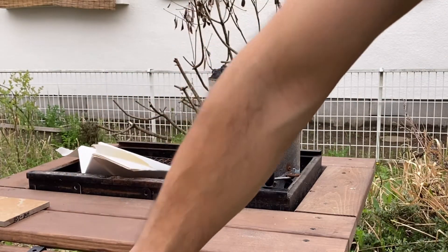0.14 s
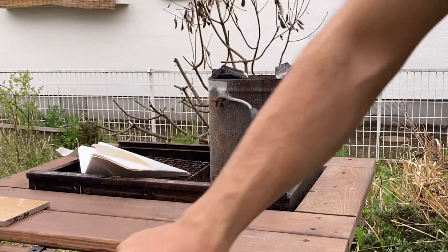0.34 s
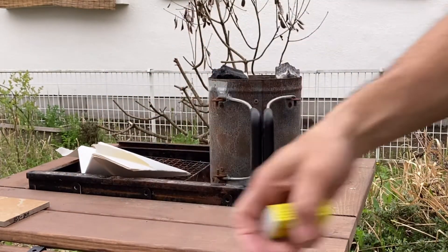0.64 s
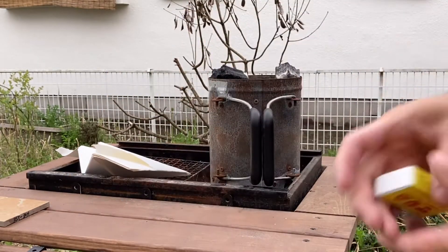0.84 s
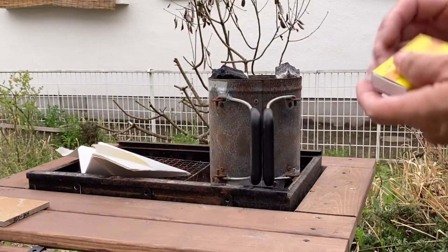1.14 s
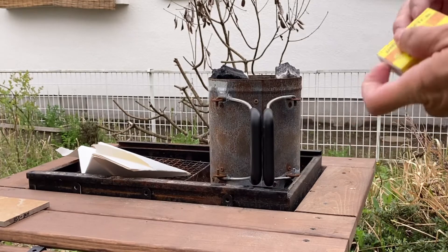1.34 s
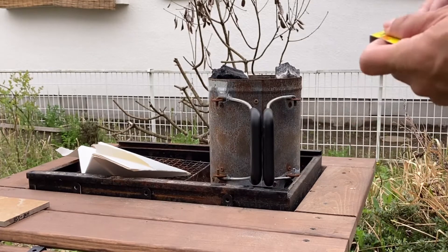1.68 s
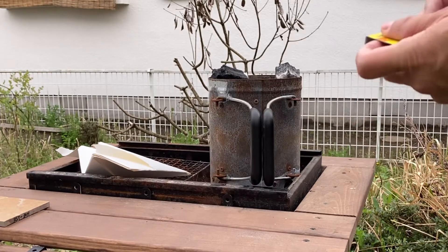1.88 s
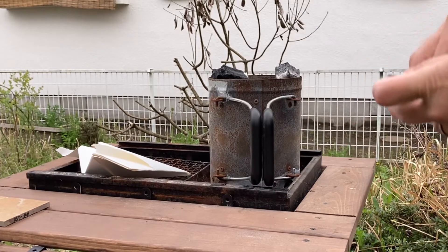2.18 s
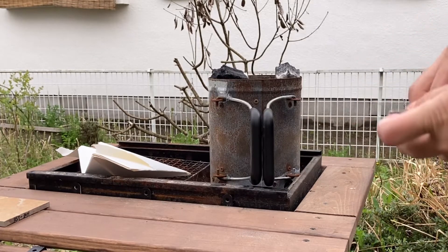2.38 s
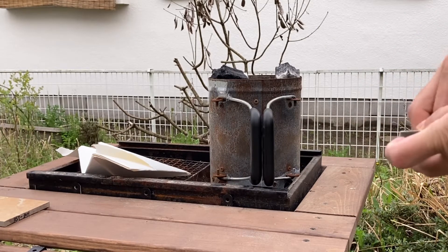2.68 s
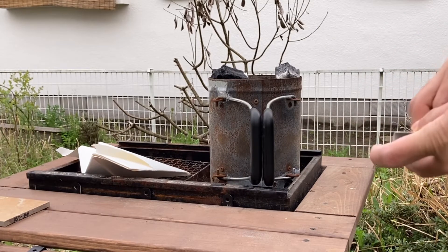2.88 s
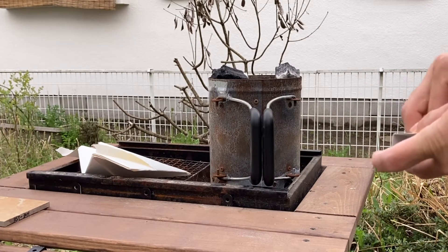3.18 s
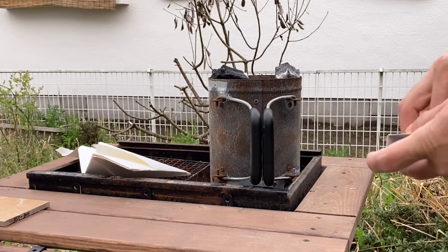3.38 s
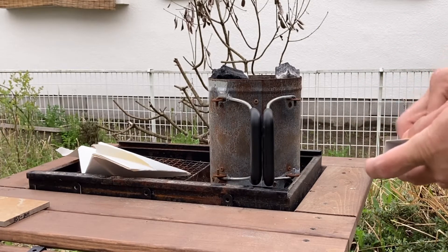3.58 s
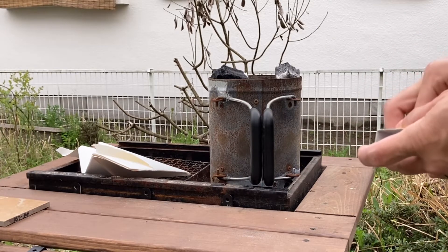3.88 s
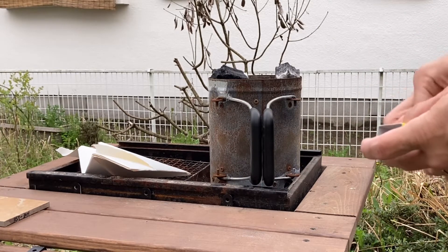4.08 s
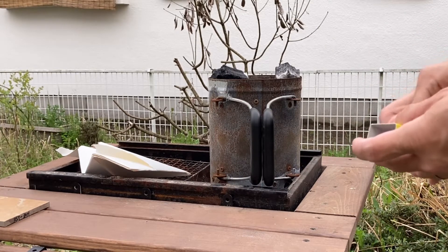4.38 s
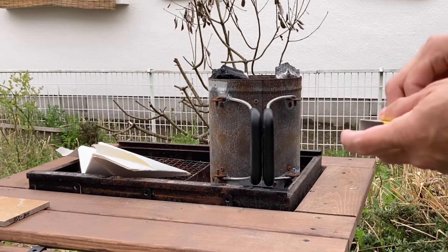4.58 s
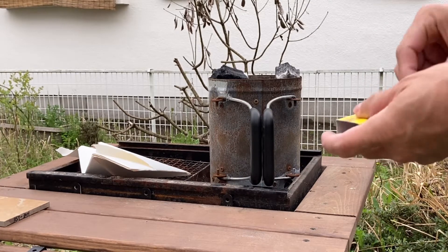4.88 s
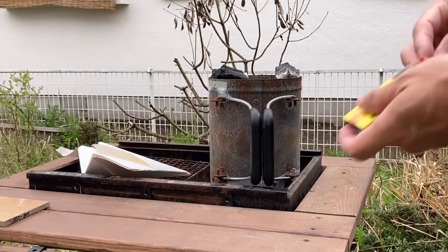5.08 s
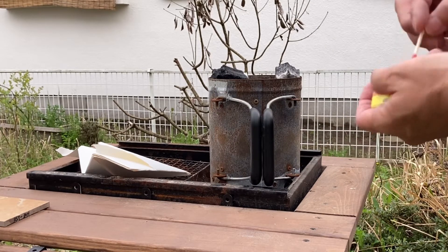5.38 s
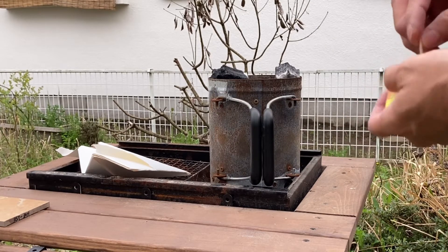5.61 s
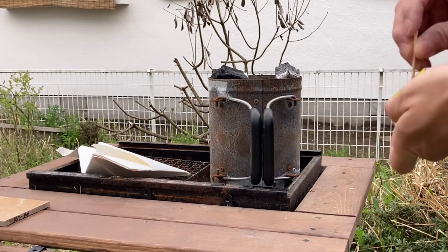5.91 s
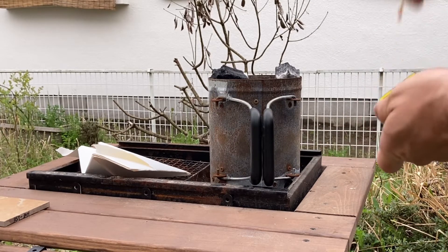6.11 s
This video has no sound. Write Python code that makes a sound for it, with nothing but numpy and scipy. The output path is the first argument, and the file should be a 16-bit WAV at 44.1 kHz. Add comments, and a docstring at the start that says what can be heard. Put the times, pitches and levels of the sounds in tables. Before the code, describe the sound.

Close up in a quiet yard, a steel charcoal starter rocks and settles with sharp high clinks, short scrapes and a low tray knock, all within the first second. Then a matchbox is handled softly: its drawer slides open, matchsticks rustle and tick under fingers, and the box shuts with a click and a tap. Faint air and wind lie beneath.

```python
"""Charcoal starter and matchbox

On a garden table, steel and hard charcoal clink and scrape: random tiny impacts excite steel rings and a tray.
A hand fingers through a matchbox: impacts and rubs excite cardboard, matchsticks and a bright crackle;
its drawer slides open and a fingertip taps the shut box. Two close microphone ports hear this with a short
yard echo, over filtered noise for air and wind and a distant, wavering hum."""
import sys
import numpy as np
from scipy import signal
from scipy.fft import rfft, irfft
from scipy.io import wavfile
from scipy.ndimage import uniform_filter1d

SR = 44100
rng = np.random.default_rng(int(sys.argv[2]) if len(sys.argv) > 2 else 0)


def to_wav(s):
    """Save 16-bit WAV."""
    ch = np.atleast_2d(s).T  # columns
    pcm = np.round(np.clip(ch, -1, 1) * 32767)  # PCM
    wavfile.write(sys.argv[1], SR, pcm.astype(np.int16))


N = 275620
TIME = np.arange(N) / SR


def undb(db):
    """Decibels to gain."""
    return 10 ** (np.asarray(db) / 20)


def unit(x):
    """Scale to an rms (average strength) of one."""
    return x / np.sqrt(np.mean(x ** 2))


def burst(x, db, seconds):
    """Scale so that the loudest stretch of this length has the given level."""
    power = uniform_filter1d(x ** 2, max(int(seconds * SR), 2), mode="constant")
    return x * undb(db) / np.sqrt(power.max())


def gain_curve(table):
    """Gain over time from a table of times and levels, silent outside it."""
    s, db = np.transpose(table)
    return undb(np.interp(TIME, s, db, left=-np.inf, right=-np.inf))


def add(track, s, x):
    """Mix x into the track from time s on."""
    start = max(int(s * SR), 0)
    track[start:start + len(x)] += x[:N - start]


def colour(x, points):
    """Filter to the given (pitch_hz, level_db) curve, with no sound ahead of its cause."""
    size = 4096
    hz, db = np.transpose(points)
    log_hz = np.log(np.fft.rfftfreq(size, 1 / SR) + 1)
    log_gain = np.log(undb(np.interp(log_hz, np.log(hz), db)))
    # folding the cepstrum puts the filter's energy as early as possible
    cepstrum = irfft(log_gain)[:size // 2]
    cepstrum[1:] *= 2
    return signal.fftconvolve(x, irfft(np.exp(rfft(cepstrum, size))))[:len(x)]


def resonate(x, peaks):
    """Sum of resonances, each (pitch_hz, width_hz, level_db)."""
    return sum(undb(db) * signal.lfilter(*signal.iirpeak(hz, hz / width, fs=SR), x)
               for hz, width, db in peaks)


def grains(count, per_second, spread_db):
    """Random tiny impacts of uneven size, rms one."""
    sizes = rng.standard_normal(count) * undb(spread_db * np.minimum(rng.exponential(size=count), 4))
    return unit(sizes * (rng.random(count) < per_second / SR) + 1e-9)


def fade(t, t60):
    """Exponential decay, 60 dB in t60 seconds."""
    return np.exp(-np.log(1000) * t / t60)


def walk(rate):
    """Smooth random wander with a spread near one, from `rate` random values per second."""
    k = int(SR / rate)
    steps = np.repeat(rng.standard_normal(N // k + 1), k)
    return unit(uniform_filter1d(uniform_filter1d(steps, k), k)[:N])


def swell(age, half):
    """Level of a stroke around its middle: grips fast, lets go slowly."""
    u = np.clip(age / half, -30, 30)
    return np.where(u < 0, np.exp(-.7 * u ** 2), 1 / np.cosh(1.37 * u))


APART = np.array([[1], [-1]])  # opposite signs at the two ports

# colour of the outdoor air: pitch_hz, level_db (per Hz)
AIR_COLOUR = [(25, -20), (60, -3), (160, -3), (300, 0), (500, -4), (1000, -10), (2000, -18), (3400, -24),
              (4300, -35), (9000, -39), (16000, -48)]


def air(level_db=-66, side_db=-8):
    """Outdoor air: gently wavering noise, shared by both ports plus a part that differs between them."""
    mid, side = (unit(colour(rng.standard_normal(N), AIR_COLOUR)) * undb(.7 * walk(4.3)) for _ in range(2))
    side = colour(side, [(100, 2.5), (500, 1), (2000, 12.5)]) * undb(side_db)
    return undb(level_db) * (mid + side * APART)


def wind(level_db=-65.5, gust_db=2.5, gust_rate=9, side_db=-12):
    """Wind rumble: low noise that swells and sinks in random gusts."""
    rumble = [(20, -34.5), (35, -7), (55, 3.0), (100, -5), (200, -17.5), (800, -52.0), (4000, -79.0)]
    shared, own = (unit(colour(rng.standard_normal(N), rumble)) for _ in range(2))
    return undb(level_db + gust_db * walk(gust_rate)) * (shared + undb(side_db) * own * APART)


# resonances of the tray on the wooden table: pitch_hz, width_hz, level_db
TRAY_RESONANCES = [(174, 31, 1), (324, 110, -4.5), (416, 22, 6.5), (468, 20, 0.5), (553, 190, 0.5),
                   (851.6, 53, 8), (934, 40, -0.5), (1176, 120, 6), (1286, 22, -3.5), (1464, 32, -1.5),
                   (1630, 60, 1), (2300, 1100, -11.5)]


def tray(push):
    """The heavy tray and the table answer mostly in the low and middle range."""
    return colour(resonate(push, TRAY_RESONANCES),
                  [(60, -9.5), (140, -4.5), (2300, -0.5), (3300, -3.5), (6000, -24)])


# steel rings, many in close pairs that beat: pitch_hz, level_db, free_ring_s (60 dB fade, before damping)
STEEL_RINGS = [(2649, -22, .5), (3200, -31, 0.19), (3730, -18, 0.52), (3777, -17.5, .5), (4285, -15, .35),
               (4590, -20.5, .35), (5033, -6, .26), (5104, -3.5, .28), (6355, -1, 0.19), (6360, -10, .6),
               (6896, -28.5, 0.26), (7570, -4, 0.23), (7780, 7.5, 0.18), (8030, -9.5, .25),
               (7870, -17, 0.23), (8807, 3.5, 0.12), (8250, -10, 0.15), (9680, -2.5, .25),
               (9860, -3.5, .25), (10330, -12, .2), (10770, -7.5, 0.3), (10626, -21, .3), (9960, -6.5, .25),
               (11700, -9.5, 0.38), (11708, -6, 0.38), (11870, -4, 0.16), (13300, -13, 0.34),
               (13006, -2, 0.23), (13200, -2, .25), (13522, -4.5, .25), (15000, -4, .22),
               (15500, -13, 0.27)]
# dense, quickly damped clink around those rings: pitch_hz, level_db
CLINK_COLOUR = [(1500, -44), (4000, -6.5), (5600, -11), (6400, -3.5), (7000, -4.5), (7900, -3),
                (9000, -9.5), (10400, -1), (11100, 1.5), (11800, -6.5), (13300, -1), (14600, -19),
                (15300, -2.5), (16500, -13.5)]


def steel_ring(t, hold, lump_db=-3, scatter_db=4.5, low_db=2, low_hold=1.1, count=30):
    """One contact: steel rings weighted by where it lands, plus short modes of the touching lump."""
    lump_t60 = .085  # seconds, before each mode's random share
    chance = rng.standard_normal((len(STEEL_RINGS), 2))
    rings = 0
    for (hz, db, t60), (a, b) in zip(STEEL_RINGS, chance):
        low = np.interp(hz, [5200, 7500], [1, 0])
        strength = undb(db + scatter_db * a + low * low_db) * np.sign(b)
        # a touch damps the low rings least
        rings = rings + strength * np.sin(2 * np.pi * hz * t) * fade(t, t60 * hold * low_hold ** low)
    pitches = np.interp(np.arange(count) + rng.random(count), [0, count], [2500, 15500])
    lump = sum(rng.standard_normal() * np.sin(2 * np.pi * hz * t) * fade(t, lump_t60 * rng.uniform(.5, 1.5))
               for hz in pitches)
    return unit(rings) + undb(lump_db) * unit(colour(lump, CLINK_COLOUR))


# the steel rings longer while it rocks; at rest its seat damps it (shares of the free ring time)
ROCK_START_S, ROCK_END_S = .34, .53
ROCKING_RING, SEATED_RING = 0.72, 0.43
# blow colour: dB of change per dB of clink, and the clink level (dB) that sounds neutral
BRIGHT_PER_DB, NEUTRAL_DB = 0.34, -31.5
# steel and charcoal blows: start_s, clink_db, tray_knock_db, chatter_s
BLOW_LIST = [(0.0, -48, -60.5, 0.0037), (0.058, -44, -54.5, .025), (0.107, -22.5, -44.5, 0.0018),
             (0.2753, -27.5, -46.5, 0.0023), (0.2867, -20, -43.5, .002), (0.298, -25, -41.5, 0.013),
             (0.352, -25.5, -26.5, 0.0039), (0.3576, -15, -34.5, 0.0068), (0.397, -28.5, -36, 0.011),
             (0.4238, -16, -44.5, .009), (0.458, -25.5, -43, 0.015), (0.479, -31, -49, 0.0055),
             (0.522, -29, -56, 0.0076), (0.534, -32, -46.5, .011), (0.658, -48.5, -49.5, 0.0062),
             (0.697, -40.5, -57, 0.0061), (0.7057, -31.5, -40, 0.0036), (0.7374, -24, -54, 0.0036),
             (0.7496, -49, -53.5, 0.0092), (1.11, -43.5, -55.5, 0.011), (1.1201, -39, -47.5, .0041)]


def blows(crack_db=-14, tray_t60=0.11, settle_db=-11, settle_t60=0.54):
    """Each blow is a brief chatter of tiny impacts that rings the steel and shakes the tray."""
    out, t = np.zeros(N), TIME[:SR * 2 // 3]
    for s, clink_db, knock_db, chatter in BLOW_LIST:
        hold = ROCKING_RING if ROCK_START_S < s < ROCK_END_S else SEATED_RING
        push = grains(len(t), 4000, 1.9) * np.exp(-(t / chatter) ** 2 / 2)
        ring = unit(signal.fftconvolve(push, steel_ring(t, hold))[:len(t)])
        clink = ring + undb(crack_db) * unit(colour(push, CLINK_COLOUR))
        # a harder contact favours the top rings, and the bottom half as much, over 7500 Hz
        bright_db = BRIGHT_PER_DB * (clink_db - NEUTRAL_DB)
        clink = colour(clink, [(4000, bright_db / 2), (7500, 0.0022), (10500, bright_db)])
        rattle = unit(push) + unit(grains(len(t), 800, 3.0) * fade(t, tray_t60))
        # the tray settles with a low clatter
        clatter = unit(colour(grains(len(t), 1500, 2.0), [(500, 0), (1200, -11)]))
        settle = clatter * fade(t, settle_t60)
        knock = burst(tray(rattle), knock_db, .007) + burst(tray(settle), knock_db + settle_db, 0.023)
        add(out, s, burst(clink, clink_db, .004) + knock)
    return out


# charcoal slides over the steel: middle_s, stroke_db (before the ring and rumble levels), half_length_s
SCRAPE_LIST = [(0.157, -32, 0.013), (0.183, -29, 0.016), (0.247, -37.5, 0.051), (0.313, -37, 0.01),
               (0.442, -30, .018), (.55, -32.5, 0.021), (.76, -49, 0.093)]


def scrapes(ring_db=-2, rumble_db=-22):
    """Sliding is a stream of tiny impacts, ringing the steel at three points and rumbling the tray."""
    stroke = sum(undb(db) * swell(TIME - s, half) for s, db, half in SCRAPE_LIST)
    t = TIME[:SR * 2 // 3]
    out = np.zeros(N)
    # the scraping wanders between three contact points, each with its own ring
    shares = undb(9.5 * np.array([walk(30) for _ in range(3)]))
    for share in shares / np.linalg.norm(shares, axis=0):
        answer = unit(steel_ring(t, hold=0.65, lump_db=-10.5)) / np.sqrt(len(t))
        push = share * stroke * grains(N, 3000, 2.5)
        out += undb(ring_db) * signal.fftconvolve(push, answer)[:N]
    return out + undb(rumble_db) * stroke * unit(tray(grains(N, 700, 3.0)))


def sticks(push, ring_db=5, sharpness=16, scatter_db=4.5, count=12):
    """A push rings a few matchsticks, at other pitches each time this is called."""
    pitches = np.geomspace(900, 11000, count) * rng.uniform(0.884, 1.126, count)
    peaks = [(hz, hz / sharpness, ring_db + scatter_db * rng.standard_normal())
             for hz in pitches.clip(100, .4 * SR)]
    return push + resonate(push, peaks)


# colour of the cardboard: pitch_hz, level_db
CARD_COLOUR = [(150, -20), (500, -1.5), (850, 2.5), (1500, 1), (2600, -2.5), (3800, -2), (5000, -9),
               (7000, -37.5)]


def box_body(push, hz, width_share, panel_db=-13):
    """The cardboard box: one resonance over the broad sound of its panels."""
    return colour(resonate(push, [(hz, hz * width_share, 0)]) + undb(panel_db) * push, CARD_COLOUR)


# the box resonates higher while its drawer is out
OPEN_S, SHUT_S = 1.711, 5.045
SHUT_HZ, OPEN_HZ = 1586, 2445


def box_hz(s, grip_scatter=0.055):
    """The box's resonance at time s: set by the drawer, shifted a little at random by each new grip."""
    hz = OPEN_HZ if OPEN_S < s < SHUT_S else SHUT_HZ
    return hz * np.exp(grip_scatter * rng.standard_normal())


# colour of the bright crackle: pitch_hz, level_db
CRACKLE_COLOUR = [(2500, -41), (4500, 6), (6000, -4.5), (7500, -1), (10500, 0.5), (13000, -3),
                  (16000, -9.5)]


def box_sound(push, hz, width_share, body_db, crackle_db, seconds):
    """One contact rings matchsticks, heard through the box body and as a bright crackle."""
    push = sticks(push)
    body = burst(box_body(push, hz, width_share), body_db, seconds)
    return body + burst(colour(push, CRACKLE_COLOUR), crackle_db, seconds)


# how strongly the fingers stir the matches: time_s, level_db (before the rustle level)
STIR_CURVE = [(.78, -68), (.88, -60), (1.1, -68), (1.72, -70), (1.95, -58), (2.17, -58), (2.45, -70),
              (2.7, -62), (3.0, -52.5), (3.27, -58.5), (3.38, -53), (3.6, -58), (4.3, -59), (4.55, -58),
              (4.7, -82), (4.9, -68.5), (5.28, -71), (6.2, -77.5)]


def stirring(rustle_db=-1.5, crackle_db=-9, stray_db=-5, strays_per_s=25):
    """Fingers stir the matches: dense tiny impacts rustle, sparse ones tick, all through the box."""
    rustle = grains(N, 4000, 2.9) * undb(4.2 * walk(24.83))
    push = rustle + undb(stray_db) * unit(sticks(grains(N, strays_per_s, 0.97)))
    body = unit(box_body(push, 2340, width_share=0.44))
    crackle = undb(crackle_db) * unit(colour(push, CRACKLE_COLOUR))
    return undb(rustle_db) * gain_curve(STIR_CURVE) * (body + crackle)


CONTACT_T = TIME[:SR // 6]
AGE = CONTACT_T - CONTACT_T[len(CONTACT_T) // 2]  # seconds since the contact
CONTACT = signal.unit_impulse(len(CONTACT_T), "mid")
# clicks of matches and cardboard: contact_s, body_db, crackle_db (relative to the body)
CLICK_LIST = [(0.794, -34, -19), (0.7996, -35, -16), (0.8194, -40, -22), (0.8368, -28.5, 2.5),
              (0.844, -30.5, 2), (0.8748, -41.5, -4), (0.895, -42, -2.5), (1.1052, -47.5, 0),
              (1.8136, -41.5, -6.5), (1.901, -44.5, -18), (2.0563, -48, -3), (2.088, -41, 3),
              (2.1839, -52, -0.5), (2.3646, -44.5, -1.5), (2.7198, -45.5, -2.5), (2.7907, -39, 4.5),
              (2.8167, -43, -5.5), (2.951, -35.5, 1.5), (3.0811, -30.5, 2.5), (3.131, -37.5, -4),
              (3.155, -40.5, -1), (3.214, -42.5, -3.5), (3.325, -48, 7), (3.3523, -42, -4),
              (3.536, -38.5, -8), (3.5745, -36.5, -2.5), (3.6183, -49, 6.5), (3.7258, -42.5, -8.5),
              (3.812, -42.5, -2.5), (3.8351, -33.5, 1.5), (3.896, -46.5, 4.5), (3.9159, -31.5, -7.5),
              (4.0623, -40, -4), (4.083, -36, -3), (4.0967, -42.5, 0.5), (4.1415, -48, 1.5),
              (4.1723, -43.5, 0.5), (4.2141, -40, -5), (4.3777, -42.5, -7.5), (4.4773, -47, -6),
              (4.4912, -40.5, -18), (4.938, -43, -5.5), (5.0169, -29, -9.5), (5.819, -43.5, -13)]


def clicks(bounce_db=-23, bounce_t60=.03, slip_db=-19, slip_s=0.0016):
    """A stick slips for a moment as it snaps, then its neighbours settle in tiny impacts."""
    out = np.zeros(N)
    for s, db, crackle_db in CLICK_LIST:
        slip = undb(slip_db) * np.exp(-abs(AGE) / slip_s)
        bounce = undb(bounce_db) * fade(abs(AGE), bounce_t60) * (AGE > 0)
        push = CONTACT + (slip + bounce) * grains(len(AGE), 3500, 2.7)
        add(out, s + AGE[0], box_sound(push, box_hz(s), 0.2, db, db + crackle_db, 0.0017))
    return out


# short rubs of fingers, matches and cardboard: middle_s, body_db (before the rub level), half_length_s
RUB_LIST = [(0.812, -48, 0.01), (0.84, -44, 0.019), (0.93, -56, 0.029), (1.81, -51, .015),
            (1.921, -50, .011), (2.034, -58.5, 0.018), (2.091, -47, .013), (2.663, -56.5, 0.007),
            (2.794, -36, 0.0042), (2.942, -38, 0.0094), (3.08, -43, 0.0047), (3.125, -49.5, 0.0094),
            (3.157, -47, 0.01), (3.225, -45, 0.014), (3.336, -52, 0.015), (3.545, -51.5, 0.0076),
            (3.569, -51, .011), (3.621, -41, 0.0034), (3.677, -56, 0.011), (3.83, -42, 0.011),
            (3.916, -49, 0.0044), (3.98, -51.5, .009), (4.087, -46, 0.0097), (4.22, -50, 0.011),
            (4.445, -57, 0.0084), (4.501, -57, .018), (4.627, -57, 0.014), (4.93, -52, 0.012),
            (5.018, -41.5, 0.0049), (5.036, -42, 0.0053), (5.051, -46.5, 0.023), (5.177, -48, 0.0073),
            (5.377, -52.5, 0.012), (5.828, -54, 0.028)]


def rubs(level_db=-1, crackle_db=-4.5, usual_half_s=0.0093, dull_db=3):
    """A rub is a short stroke of tiny impacts; quick rubs crackle, slow ones are dull."""
    out = np.zeros(N)
    for s, db, half in RUB_LIST:
        # the crackle falls by dull_db for each doubling of the length
        rub_crackle_db = crackle_db - dull_db * np.log2(half / usual_half_s)
        push = grains(len(AGE), 3000, 1.9) * swell(AGE, half)
        sound = box_sound(push, box_hz(s), .4, db, db + rub_crackle_db, 2 * half)
        add(out, s + AGE[0], undb(level_db) * sound)
    return out


# skin on the sleeve: middle_s, body_db (before the swish level), half_length_s, hiss_db (relative to the body)
SWISH_LIST = [(1.32, -64, 0.14, 4), (1.477, -62, 0.048, -5.5), (2.32, -68, 0.097, 4),
              (4.892, -62.5, 0.037, -11), (5.13, -56, .025, -1), (5.205, -58, .017, -2.5),
              (5.5, -63, 0.12, -6), (5.69, -68, .04, -7)]


def swishes(level_db=-1):
    """Skin slides smoothly over the sleeve as the grip changes: very dense impacts as body and hiss."""
    out = np.zeros(N)
    skin = grains(N, 15000, 0.92)
    body = unit(box_body(skin, 2120, width_share=1.0))
    hiss = unit(colour(skin, CRACKLE_COLOUR))
    for s, db, half, hiss_db in SWISH_LIST:
        out += undb(level_db + db) * swell(TIME - s, half) * (body + undb(hiss_db) * hiss)
    return out


# the sleeve's resonances: pitch_hz, width_hz, level_db
SLEEVE_RESONANCES = [(2180, 170, -1.5), (2820, 370, 2), (4020, 690, -1.5), (5000, 320, 0.5),
                     (7760, 1000, -4.5), (9560, 410, -15), (13280, 1200, -22)]


def drawer_slide(level_db=-38, half_s=0.017):
    """The drawer slides out: a stroke of dense tiny impacts rings its sleeve."""
    friction = colour(grains(N, 9000, 2.1), [(1200, -35.0), (2100, 6.0)])
    return undb(level_db) * swell(TIME - OPEN_S, half_s) * unit(resonate(friction, SLEEVE_RESONANCES))


# the hum swells and fades: time_s, level_db
HUM_LEVEL = [(2.4, -81), (2.8, -74), (3.45, -77), (3.65, -68.5), (4.45, -70), (5.2, -79.5), (6.25, -77)]


def hum(pitch_hz=404):
    """Distant hum: one sine whose pitch and level waver at random."""
    wavering_hz = pitch_hz * (1 + 0.00807 * walk(30))
    tone = np.sin(2 * np.pi * np.cumsum(wavering_hz) / SR)
    return gain_curve(HUM_LEVEL) * unit(tone * undb(3.3 * walk(12)))


def lid_tap(s=5.3487, level_db=-29.5, low_hz=1480, high_hz=2700):
    """A fingertip snaps against the closed box: one impulse kept to a narrow band."""
    out = np.zeros(N)
    band = signal.butter(3, [low_hz, high_hz], "band", fs=SR, output="sos")
    add(out, s + AGE[0], burst(signal.sosfilt(band, CONTACT), level_db, 0.0018))
    return out


def ports(x, phase, left_db):
    """Two ports on one body: sound reaches them out of step, and the middle range leans left."""
    f = np.fft.rfftfreq(N, 1 / SR)
    turn = np.exp(.5j * np.interp(f, *np.transpose(phase)))
    lean = undb(np.interp(f, [200, 600, 2500, 9000], [0, left_db, left_db / 2, 0]) / 2)
    return irfft(rfft(x) * np.array([turn * lean, lean.clip(1e-9) ** -1 / turn]), N)


def yard(x, wet_db, t60):
    """Table, fence and house wall scatter a short echo, different at each port: fading random impacts."""
    t = TIME[:SR // 2]
    tone = [(100, -9), (500, 0.5), (2500, 0.0), (6000, 1.5), (15000, -7)]
    tails = [colour(grains(len(t), 5500, 0.69) * fade(t, t60) * (t > .003), tone) for _ in range(2)]
    return undb(wet_db) * np.array([signal.fftconvolve(x, unit(tail) / np.sqrt(len(t)))[:N] for tail in tails])


# phase of the left port ahead of the right (negative: behind), for each source: pitch_hz, phase_radians
STEEL_PORT_PHASE = [(100, 0), (2000, -.6), (3500, -1.8), (5300, -3.4), (6400, -5.9), (7600, -6.6),
                    (8900, -9.4), (11700, -12.9), (13500, -15.7), (15300, -18.6)]
BOX_PORT_PHASE = [(100, 0), (1600, -.7), (3500, -.8), (5000, -3.2), (7000, -6.4), (9000, -9.4),
                  (13600, -15.7), (15400, -18.7)]


def scene():
    """The grill and the matchbox in the yard."""
    background = air() + wind()
    steel = blows() + scrapes()
    box = stirring() + clicks() + rubs() + swishes() + drawer_slide() + lid_tap()
    direct = ports(steel, STEEL_PORT_PHASE, left_db=4.0) + ports(box, BOX_PORT_PHASE, left_db=2.0)
    echo = yard(steel, wet_db=-10, t60=0.13) + yard(box, wet_db=-12.5, t60=0.074)
    return direct + echo + background + hum()


def record(dry):
    """The recorder cuts the top: a steep low-pass filter at 15900 Hz."""
    return signal.sosfilt(signal.ellip(10, .2, 70, 15900, fs=SR, output="sos"), dry)


dry = scene()
out = record(dry)
to_wav(out)
```